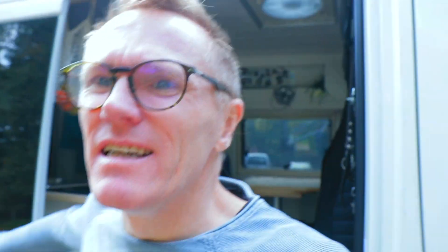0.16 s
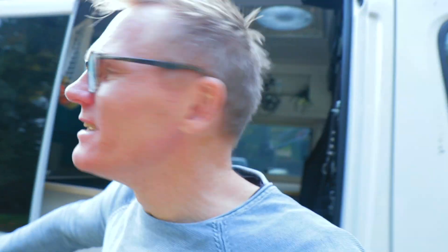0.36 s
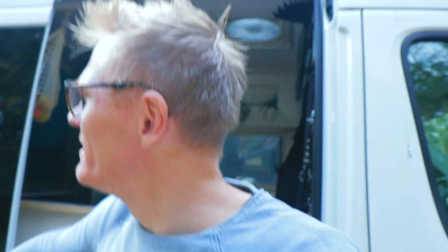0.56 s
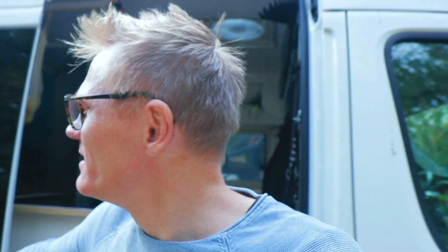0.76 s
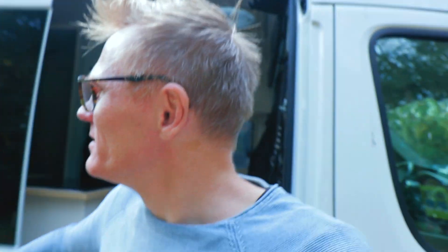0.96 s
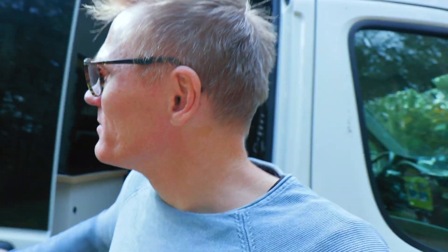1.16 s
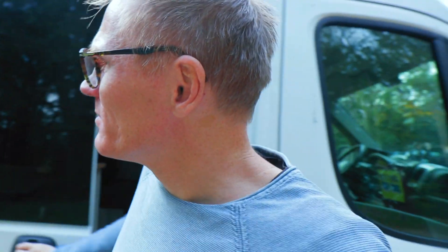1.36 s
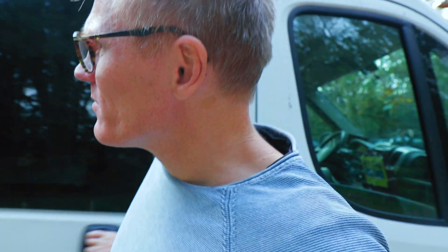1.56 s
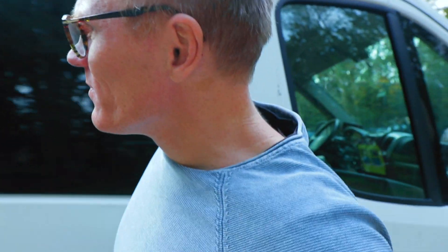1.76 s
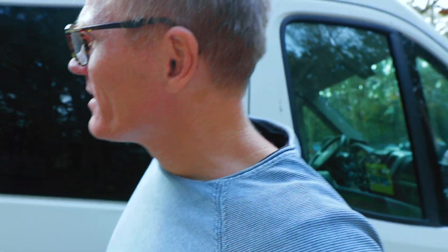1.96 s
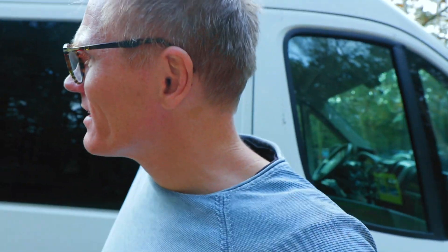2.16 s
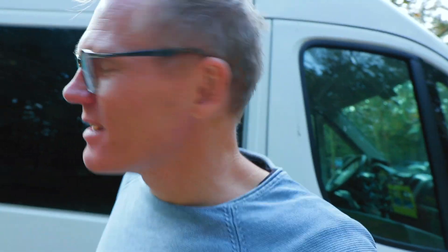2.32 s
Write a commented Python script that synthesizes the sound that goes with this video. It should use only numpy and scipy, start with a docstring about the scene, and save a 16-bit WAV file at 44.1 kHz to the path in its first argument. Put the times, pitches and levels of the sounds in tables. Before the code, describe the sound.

A camper van's sliding side door rumbles along its track and slams shut with a boom

```python
"""The sliding side door of a camper van is shut outdoors, over a faint hush and wind on the microphone.
First come dull thumps of handling: struck modes and fading noise, with scuffs, ticks, taps and rustles.
Then rollers gather speed: random contacts and noise, filtered, rumble and hiss and excite panel modes.
They bump and clack, then the door meets pawl, catch and frame: noise bursts, and pushes ringing metal.
Last, the seal squeezes the cabin air into a modal boom, and fittings rattle out as short noise bursts."""
import sys
import numpy as np
from scipy import signal
from scipy.fft import rfft, irfft
from scipy.io import wavfile

SR = 44100
rng = np.random.default_rng(int(sys.argv[2]) if len(sys.argv) > 2 else 0)


def bounce(signal):
    """Save signal as a 16-bit WAV file at the path given by the first command-line argument."""
    frames = np.transpose(np.atleast_2d(signal))
    limited = np.clip(frames, -1, 1)
    pcm = np.round(limited * 32767).astype(np.int16)
    wavfile.write(sys.argv[1], SR, pcm)


N = 109764  # length [samples]

# Door speed: (time [s], speed [dB re full speed])
DOOR_SPEED = [(.55, -64), (0.718, -28.5), (.86, -19), (.93, -12.5), (1.07, -8), (1.19, -5), (1.43, -2),
              (1.49, -2), (1.56, -1.5), (1.66, 0), (1.74, -2.5), (1.802, -4.5), (1.84, -2), (1.90, -20)]
# Spectra of roller rumble, gritty grinding and bearing hiss: (frequency [Hz], relative density [dB])
RUMBLE_SPECTRUM = [(40, -56), (100, -24.5), (135, -0.5), (175, -4), (235, 5), (290, -4.5), (420, -7),
                   (700, -35.5), (2000, -64)]
GRIND_SPECTRUM = [(120, -22), (280, -6.5), (400, 0.5), (600, -0.5), (760, -8.5), (1100, -9.5), (1650, -15),
                  (2300, -31.5), (4000, -30), (10000, -80)]
HISS_SPECTRUM = [(800, -2.5), (2200, 10.5), (3200, 2), (4000, -8), (5400, 1), (6500, -1), (7600, -9),
                 (9300, -11), (11000, -29), (16000, -32)]
# Surges of the rumble along the track: (time [s], 1/e half-width [s], level change [dB])
RUMBLE_SURGES = [(.82, .02, 3), (.935, .035, 5), (1.05, .04, -2), (1.17, .02, 3), (1.505, .045, 7.5),
                 (1.62, .035, 4), (1.765, .04, -5)]
# Ringing bands of the roller bearings: (centre [Hz], random values per second [Hz], level [dB])
BEARING_BANDS = [(6300, 1200, -59), (8900, 1400, -66)]
# Modes of the door skin: (frequency [Hz], relative level [dB], t60 [s])
PANEL_MODES = [(143, -1, .3), (220, -2, .25), (252, -1, .25), (309, -1, .22), (368, 0, .2), (479, -1, .2),
               (520, -8, .2), (574, -2, .18), (662, 2, .18), (748, -4, .2), (779, -6, .18), (899, -10, .22),
               (991, -12, .22)]
# Soft bumps of the rollers on the track: (time [s], thud level [dB], body level [dB], t60 [s])
TRACK_BUMPS = [(0.552, -44, -79, 0.026), (0.689, -46, -57, 0.12), (.752, -42, -67, 0.034),
               (0.809, -37.5, -56, 0.091), (0.877, -36.5, -54, 0.078), (0.929, -37, -41, 0.058),
               (1.169, -30.5, -52, 0.059), (1.47, -42, -27.5, 0.2), (1.646, -32.5, -29, 0.043),
               (1.706, -47, -30, 0.1), (1.728, -54, -24.5, 0.1)]
# Roller clacks through the bend of the track: (time [s], level [dB])
ROLLER_CLACKS = [(1.703, -41), (1.711, -41)]
# Spectrum of a clack: (frequency [Hz], relative density [dB])
CLACK_SPECTRUM = [(700, -13), (1100, 3), (1600, -4), (2200, 4), (3000, -5), (4050, 5.5), (5000, -10),
                  (7500, -13.5), (10500, -29), (16000, -45)]
# Knocks of the door on catch and frame, then of loose fittings:
# (time [s], thud level [dB], body level [dB], clank level [dB], click level [dB], t60 [s])
KNOCK_BLOWS = [(1.828, -24, -13, -33, -60, 0.062), (1.834, -43, -26, -23, -24.5, 0.044),
               (1.8522, -37, -15, -32, -34, 0.099), (1.857, -16.5, -7, -11.5, -23, 0.041),
               (1.870, -26, -18, -22, -29.5, 0.085), (1.8884, -12, -6.5, -19.5, -25, 0.052),
               (1.892, -6, -12, -18, -29, 0.036), (1.942, -35, -27.5, -33, -52, 0.094),
               (1.957, -31, -43, -39, -54, 0.044), (1.966, -19, -24.5, -39, -58, 0.057),
               (1.976, -44, -32, -45, -55, 0.11), (2.008, -47, -53, -41, -50, 0.084)]
# Spectra of the four parts of a knock: (frequency [Hz], relative density [dB])
THUD_SPECTRUM = [(20, -14), (50, -19), (100, -5), (140, 0.5), (200, -8.5), (400, -9.5), (1500, -49),
                 (8000, -99)]
BODY_SPECTRUM = [(60, -33.5), (180, -8.5), (330, 4), (480, 1), (680, -0.5), (900, -9.5), (1500, -18),
                 (4000, -73), (12000, -89)]
CLANK_SPECTRUM = [(300, -19.5), (900, 3.5), (1400, 5.5), (1900, 5), (2500, 4), (2900, -7), (4200, -9.5),
                  (8000, -34), (16000, -56)]
CLICK_SPECTRUM = [(1200, -20), (3000, 12), (4800, 4.5), (6500, 3.5), (9000, -4), (12000, -14), (16000, -20)]
# Sharp snaps of the latch: (time [s], level [dB])
LATCH_SNAPS = [(1.8657, -36), (1.8704, -27.5), (1.8921, -28.5), (2.005, -43.5), (2.027, -57)]
# Spectrum of a snap: (frequency [Hz], relative density [dB])
SNAP_SPECTRUM = [(1500, -21), (5500, 7), (9000, 8), (13000, 0), (16000, -3)]
# Modes of the pawl and of the steel catch: (frequency [Hz], relative level [dB], t60 [s])
PAWL_MODES = [(3940, -12, 0.054), (4760, 0.5, 0.038), (4920, -4, .04), (5700, -3, 0.047), (6010, -7, 0.068)]
CATCH_MODES = [(1437, -6, .2), (1839, 1, .17), (1875, -1, .15), (2026, -1, .17), (2342, -4, .14),
               (2500, 1, .08), (3542, -11, .12), (3854, -12, .12)]
# Modes of the cabin air: (frequency [Hz], relative level [dB], t60 [s])
CABIN_MODES = [(54, 1, .2), (86, -10, .2), (125, -5, .24), (142, -3, .28), (200, -10, .22), (264, -10, .25)]
# Rattles of loose fittings after the slam: (time [s], level [dB])
FITTING_RATTLES = [(1.924, -44), (1.9437, -44), (1.9507, -43), (1.9557, -43), (1.963, -45), (1.979, -45),
                   (1.9825, -47), (1.993, -44), (2.0115, -48)]
# Spectrum of a rattle: (frequency [Hz], relative density [dB])
RATTLE_SPECTRUM = [(700, -7), (1600, 5), (3000, 2), (6200, 0.5), (9500, -8), (12000, -16), (16000, -18)]
# One deep thump: (time [s], level [dB])
DEEP_THUMP_EVENT = (0.00058, -13.5)
# Modes of the deep thump: (frequency [Hz], relative level [dB], t60 [s])
DEEP_THUMP_MODES = [(49.6, -1.5, 0.11), (88.3, 0.5, 0.13), (135, -31, .06)]
# Soft bumps of handling: (time [s], level [dB])
HANDLING_THUMPS = [(.001, -40.5), (.1965, -31), (.212, -42.5), (.246, -52)]
# Spectrum of a soft bump: (frequency [Hz], relative density [dB])
SOFT_SPECTRUM = [(40, 0), (150, -1), (330, 8), (720, -2), (1100, -13), (2500, -26), (9000, -38),
                 (16000, -52)]
# Scuffs around the deep thump: (time [s], level [dB])
SCUFF_EVENTS = [(.001, -34.5), (.026, -44)]
# Spectrum of scuffs and rustles: (frequency [Hz], relative density [dB])
SCUFF_SPECTRUM = [(300, -14), (900, 10), (1700, 2.5), (2500, -5), (5000, -6.5), (9000, -14), (16000, -25)]
# Brief rustles of handling: (time [s], 1/e half-width [s], level [dB])
HANDLING_RUSTLES = [(.422, 0.0098, -55), (.475, 0.023, -54), (.62, 0.03, -56)]
# Light ticks: (time [s], level [dB])
LIGHT_TICKS = [(.1026, -35), (.464, -45), (2.0975, -44), (2.339, -52)]
# Spectrum of a tick: (frequency [Hz], relative density [dB])
TICK_SPECTRUM = [(600, -24), (1100, -4), (2300, 1), (3300, 2.5), (4700, -5.5), (6300, -3), (7600, -9),
                 (9000, -14), (16000, -28)]
# Light taps of handling with a soft brushing tail: (time [s], level [dB])
HANDLING_TAPS = [(.4635, -45), (.8, -54.5)]
# Spectrum of a tap: (frequency [Hz], relative density [dB])
TAP_SPECTRUM = [(400, -3), (900, 15), (2000, -1), (4500, -7), (7000, -10), (8700, -1), (10500, -17),
                (16000, -12)]
# Spectra of the outdoor hush and of wind on the microphone: (frequency [Hz], relative density [dB])
OUTDOOR_SPECTRUM = [(30, -22), (100, -14), (160, -11.5), (400, -13), (700, -9.5), (1500, -10), (2200, -20),
                    (3900, -29), (9000, -37), (15600, -46.5)]
WIND_SPECTRUM = [(10, -1.5), (24, 2.5), (34, -19.5), (55, -7.5), (100, -11), (200, -25.5), (600, -30),
                 (6000, -100)]
# Wind on the microphone: (time [s], level [dB])
WIND_GUSTS = [(.05, -44), (.2, -38), (.3, -53.5), (.45, -47.5), (0.529, -47.5), (.8, -41.5), (.87, -52),
              (1.04, -38), (1.25, -73), (1.8, -48), (2.15, -46), (2.48, -52)]

RUMBLE_DB, GRIND_DB, HISS_DB, ROLL_RING_DB = -32.5, -33, -48, -38.5  # at full speed
RUMBLE_LAW, GRIND_LAW, HISS_LAW, BEARING_LAW = 0.79, 1.21, 1.57, 1.5  # dB of sound per dB of speed
GRIT_PER_S, GRIT_SPREAD_DB = 3500, 3
JUDDER_HZ, JUDDER_DB = 34.37, 1.13  # random values per second, scale of the wander
HISS_GRAIN_HZ, HISS_GRAIN_DB = 260, 2.5
BEARING_DRIFT, BEARING_SWELL_DB = .03, 2.5  # drift is a fraction of the frequency
# From the bend of the track, hiss and bearings follow a lowered speed level
BEND_S, BEND_FADE_S, BEND_SPEED_DB = 1.71, 0.091, -2
ATTACK_S, CHATTER_HZ, CHATTER_DB = 0.0012, 441, 1.5
TAIL_DB, TAIL_T60_S, TREBLE_TAIL_T60_S = -22, 0.42, 0.34
IMPACT_DB = 14.5  # gain of the clean blow ahead of the chatter
SHAKE_DB = -41  # gain from knock noise to the door skin
PAWL_S, CATCH_S, FRAME_S = 1.835, 1.858, 1.8895  # moments the door strikes each
PAWL_DB, CATCH_DB, SLAM_RING_DB = -26, -30, -20.5
SEAT_S, PUSH_S, BOOM_DB, LEAK_HZ = 1.897, 0.003, -18, 32
CLACK_T60_S, SNAP_T60_S, RATTLE_T60_S = 0.093, 0.018, 0.022
SOFT_T60_S, SCUFF_T60_S, TICK_T60_S, TAP_T60_S = 0.13, 0.069, .011, 0.087
OUTDOORS_DB, TOP_HZ = -52, 15750


def amp(db):
    """Logarithmic level: decibels become an amplitude ratio."""
    return 10 ** (np.asarray(db) / 20)


def unit(x):
    """Normalisation to unit root mean square."""
    return x / np.sqrt(np.mean(x ** 2) + 1e-18)


def clock():
    """Sampling: the time of every sample in seconds."""
    return np.arange(N) / SR


def fade(age, t60):
    """Exponential damping from age 0, falling 60 dB in t60 seconds."""
    return (age >= 0) * np.exp(-np.log(1000) * np.maximum(age, 0) / max(t60, 1e-3))


def colour(x, points):
    """Minimum-phase filtering through (Hz, dB) points; white noise keeps its power."""
    size = 8192
    hz, db = np.array(points, float).T
    f = np.maximum(np.arange(size // 2 + 1) * SR / size, 1)
    log_gain = np.log(amp(np.interp(np.log(f), np.log(hz), db)))
    # Folding the cepstrum onto positive time makes the response causal
    cepstrum = irfft(log_gain)
    cepstrum[1:size // 2] *= 2
    cepstrum[size // 2 + 1:] = 0
    response = irfft(np.exp(rfft(cepstrum)))
    return signal.fftconvolve(x, response / np.linalg.norm(response))[:N]


def ring(x, modes):
    """Modal superposition: a force is convolved with a sum of damped sines."""
    t = clock()[:SR]
    response = sum(amp(db) * np.sin(2 * np.pi * hz * t) * fade(t, t60) for hz, db, t60 in modes)
    return signal.fftconvolve(x, response)[:N]


def push(at, width):
    """Impulse of force: a Gaussian whose samples sum to one."""
    force = np.exp(-np.pi * ((clock() - at) / width) ** 2)
    return force / (force.sum() + 1e-18)


def noise():
    """White Gaussian noise, rms 1."""
    return rng.standard_normal(N)


def walk(rate):
    """Random modulation: straight lines join normal random values, rate per second."""
    return np.interp(clock() * rate, np.arange(4096), rng.standard_normal(4096))


def bursts(rows, t60):
    """Damped noise: a burst starts at each (time, level) row and decays exponentially."""
    return sum(amp(db) * fade(clock() - at, t60) for at, db in rows) * noise()


def grit():
    """Random contact excitation: dense tiny impulses of uneven size between roller and track."""
    largest = 2.5
    size = np.clip(noise() * amp(GRIT_SPREAD_DB * noise()), -largest, largest)
    contact = rng.random(N) < GRIT_PER_S / SR
    return unit(contact * size)


def rollers():
    """Rolling contact excites the panel; differing speed laws make faster rolling louder and brighter."""
    t = clock()
    speed = np.interp(t, *np.array(DOOR_SPEED).T, left=-90, right=-90)
    judder = JUDDER_DB * walk(JUDDER_HZ)
    surge = sum(db * np.exp(-((t - at) / width) ** 2) for at, width, db in RUMBLE_SURGES)
    rumble = colour(grit() * amp(RUMBLE_DB + RUMBLE_LAW * speed + judder + surge), RUMBLE_SPECTRUM)
    grind = colour(grit() * amp(GRIND_DB + GRIND_LAW * speed + judder), GRIND_SPECTRUM)
    grain = HISS_GRAIN_DB * walk(HISS_GRAIN_HZ)
    spin = speed + BEND_SPEED_DB * np.clip((t - BEND_S) / BEND_FADE_S, 0, 1)
    hiss = colour(noise() * amp(HISS_DB + HISS_LAW * spin + judder + grain), HISS_SPECTRUM)
    skin_level = amp(ROLL_RING_DB + GRIND_LAW * speed + surge / 2)
    skin = unit(ring(grit(), PANEL_MODES)) * skin_level
    return rumble + grind + hiss + skin + bearings(spin)


def bearings(spin):
    """Narrow-band noise: random quadrature modulation of drifting carriers, each swelling on its own."""
    out = 0
    for hz, width, db in BEARING_BANDS:
        phase = 2 * np.pi * np.cumsum(hz * (1 + BEARING_DRIFT * walk(10))) / SR
        band = walk(width) * np.cos(phase) + walk(width) * np.sin(phase)
        out = out + band * amp(db + BEARING_LAW * spin + BEARING_SWELL_DB * walk(20))
    return out


def bumps():
    """Impact excitation: rollers drop over joints and dents in the track, heard as damped noise."""
    t = clock()
    shapes = [amp([thud_db, body_db])[:, None] * fade(t - at, t60)
              for at, thud_db, body_db, t60 in TRACK_BUMPS]
    thud, body = sum(shapes)
    return colour(thud * noise(), THUD_SPECTRUM) + colour(body * noise(), BODY_SPECTRUM)


def roller_clacks():
    """Impact noise with exponential decay: the rollers clack through the bend of the track."""
    return colour(bursts(ROLLER_CLACKS, CLACK_T60_S), CLACK_SPECTRUM)


def knock_power(age, t60, tail_t60):
    """Two-slope decay: the powers of a quick fall and a faint bodywork tail add after a linear attack."""
    attack = np.clip(age / ATTACK_S, 0, 1)
    return attack * (fade(age, t60) ** 2 + (amp(TAIL_DB) * fade(age, tail_t60)) ** 2)


def knocks():
    """Impact of solids: a blow, metal chatter and a bodywork tail, which also excite the door skin."""
    t = clock()
    powers, impacts = np.zeros((4, N)), np.zeros(N)
    for at, thud_db, body_db, clank_db, click_db, t60 in KNOCK_BLOWS:
        gains = amp([thud_db, body_db, clank_db, click_db])[:, None]
        low = knock_power(t - at, t60, TAIL_T60_S)
        high = knock_power(t - at, t60, TREBLE_TAIL_T60_S)
        powers += gains ** 2 * np.array([low, low, high, high])
        impacts += amp(body_db) * push(at + ATTACK_S, .00007)
    thud, body, clank, click = np.sqrt(powers)
    chatter = amp(CHATTER_DB * walk(CHATTER_HZ))
    dull = colour(thud * noise(), THUD_SPECTRUM)
    dull += colour(body * noise() + amp(IMPACT_DB) * impacts, BODY_SPECTRUM)
    bright = colour(clank * chatter * noise(), CLANK_SPECTRUM)
    bright += colour(click * chatter * noise(), CLICK_SPECTRUM)
    snaps = colour(bursts(LATCH_SNAPS, SNAP_T60_S), SNAP_SPECTRUM)
    skin = amp(SHAKE_DB) * ring(body * noise(), PANEL_MODES)
    return dull + bright + snaps + skin


def metal():
    """Free vibration after an impulse: pawl, catch and door skin are struck in turn and ring."""
    strikes = [(PAWL_S, PAWL_DB, PAWL_MODES), (CATCH_S, CATCH_DB, CATCH_MODES),
               (FRAME_S, SLAM_RING_DB, PANEL_MODES)]
    return sum(amp(db) * ring(push(at, .00005), modes) for at, db, modes in strikes)


def boom():
    """Cavity resonance: the seating door squeezes the cabin air; slow pressure leaks away."""
    air = ring(push(SEAT_S, PUSH_S), CABIN_MODES)
    leak = signal.butter(2, LEAK_HZ, "high", fs=SR, output="sos")
    return -amp(BOOM_DB) * signal.sosfilt(leak, air)


def fittings():
    """Repeated impacts with short decay: loose fittings chatter as the door settles."""
    return colour(bursts(FITTING_RATTLES, RATTLE_T60_S), RATTLE_SPECTRUM)


def small_sounds():
    """Weak impact and friction: a modal thump, and filtered noise for bumps, ticks, taps and scuffs."""
    t = clock()
    thump_s, thump_db = DEEP_THUMP_EVENT
    deep = amp(thump_db) * ring(push(thump_s, 0.00031), DEEP_THUMP_MODES)
    soft = colour(bursts(HANDLING_THUMPS, SOFT_T60_S), SOFT_SPECTRUM)
    ticks = colour(bursts(LIGHT_TICKS, TICK_T60_S), TICK_SPECTRUM)
    taps = colour(bursts(HANDLING_TAPS, TAP_T60_S), TAP_SPECTRUM)
    rustle_level = sum(amp(db) * np.exp(-((t - at) / width) ** 2) for at, width, db in HANDLING_RUSTLES)
    rustle = rustle_level * grit()
    scuffs = colour(bursts(SCUFF_EVENTS, SCUFF_T60_S) + rustle, SCUFF_SPECTRUM)
    return deep + soft + ticks + taps + scuffs


def outdoors():
    """Broadband background noise: a gently wavering hush, and wind gusts on the microphone."""
    hush = colour(noise() * amp(OUTDOORS_DB + .5 * walk(7.0)), OUTDOOR_SPECTRUM)
    gust = amp(np.interp(clock(), *np.array(WIND_GUSTS).T))
    return hush + colour(noise() * gust, WIND_SPECTRUM)


def scene():
    """Linear superposition: the pressures of all sources add at one microphone."""
    door = rollers() + bumps() + roller_clacks() + knocks() + metal()
    return (door + boom() + fittings() + small_sounds() + outdoors())[None]


def record(dry):
    """Saturation rounds the highest peaks, and a low-pass filter limits the bandwidth."""
    ceiling = 1.3
    rounded = ceiling * np.tanh(dry / ceiling)
    low_pass = signal.ellip(10, .2, 80, TOP_HZ, fs=SR, output="sos")
    return signal.sosfilt(low_pass, rounded)


dry = scene()
out = record(dry)
bounce(out)
```